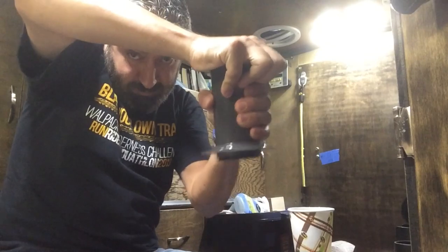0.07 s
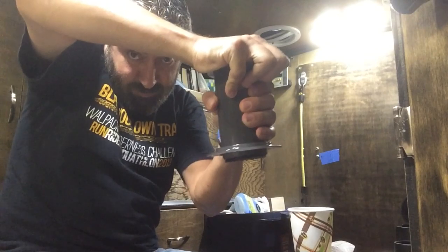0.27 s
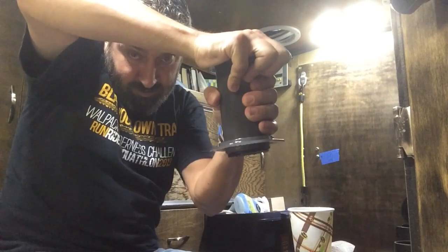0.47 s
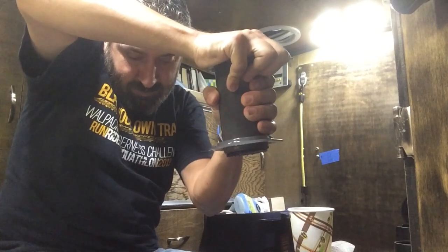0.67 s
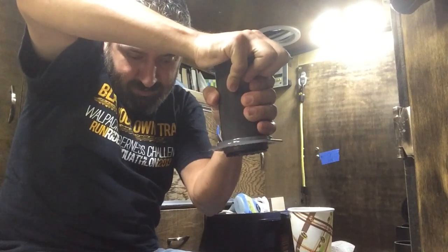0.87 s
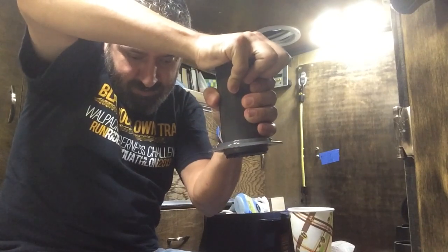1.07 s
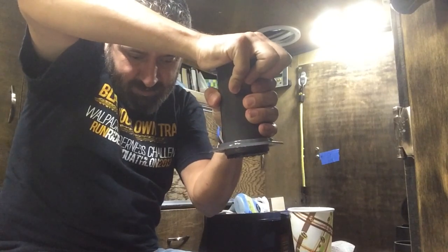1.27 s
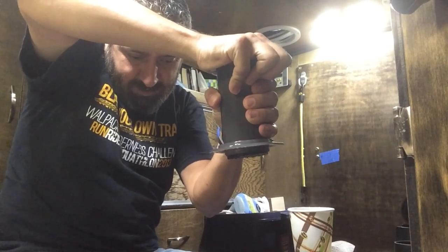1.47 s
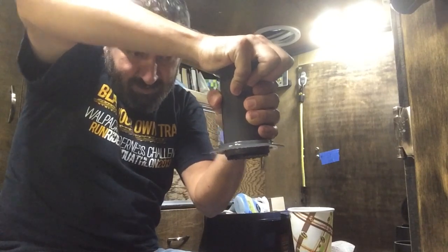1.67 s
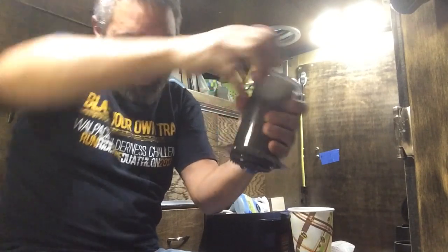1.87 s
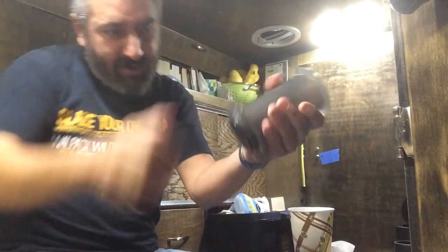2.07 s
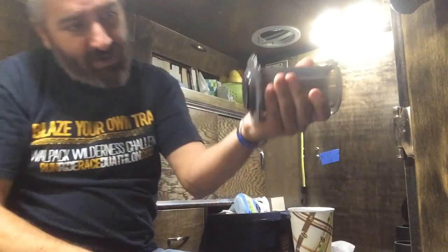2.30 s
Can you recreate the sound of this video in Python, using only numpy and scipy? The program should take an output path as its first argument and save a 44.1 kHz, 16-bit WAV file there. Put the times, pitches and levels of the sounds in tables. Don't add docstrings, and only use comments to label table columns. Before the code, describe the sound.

Close to a small microphone in a cramped van, a plunger cracks loudly, spent grounds drop and patter in a bin, and after a low rumbling pause the empty tube scuffs and pops hollowly, rising in pitch.

```python
import sys
import numpy as np
from scipy import signal
from scipy.fft import rfft, irfft, next_fast_len
from scipy.io import wavfile
from scipy.ndimage import map_coordinates

SR = 44100
rng = np.random.default_rng(int(sys.argv[2]) if len(sys.argv) > 2 else 0)


def store_pcm(level_fs):
    pcm = np.round(np.clip(level_fs, -1, 1) * 32767).astype(np.int16)
    wavfile.write(sys.argv[1], SR, np.atleast_2d(pcm).T)


def voltage_ratio(decibels):
    exponent = np.asarray(decibels, float) / 20
    return 10 ** exponent


N = 103061
T = np.arange(N) / SR


def unit(x):
    return x / np.sqrt(np.mean(x ** 2) + 1e-20)


def along(points, hz):
    f, v = np.transpose(points)
    return np.interp(np.log(hz + 1), np.log(f + 1), v)


def filtered(x, response):
    size = next_fast_len(len(x) + 8192)
    gain = response(np.fft.rfftfreq(size, 1 / SR))
    return irfft(rfft(x, size) * gain, size)[:len(x)]


def fall(start_s, t60_s, rise_s=0.00012):
    t = np.maximum(T - start_s, 0)
    return voltage_ratio(-60 * t / t60_s) * (1 - np.exp(-t / rise_s))


def ring(start_s, hz, db, t60_s):
    phase = 2 * np.pi * rng.random()
    return voltage_ratio(db) * fall(start_s, t60_s) * np.sin(2 * np.pi * hz * (T - start_s) + phase)


# pitch in Hz, level in dB, t60 in seconds.
SLIDE_MODES = [(2532, -19.5, 0.033), (917.4, -23.5, .04), (356, -26, 0.037), (8100, -46, 0.092),
               (55.3, -29, 0.21), (150, -31, 0.024)]


def slide():
    hiss = unit(filtered(rng.standard_normal(N), lambda f: 1 / (1 + (f / 3000) ** 2)))
    modes = sum(ring(-0.00084, *mode) for mode in SLIDE_MODES)
    return modes + voltage_ratio(-36) * fall(-.001, .05) * hiss


SNAP_S = .0098
# frequency in Hz, level in dB.
CLATTER_SPECTRUM = [(60, -11), (550, -5.5), (900, -16.5), (1550, 4), (2000, -11), (4200, -1), (8000, -10),
                    (15000, -32.5)]
# frequency in Hz, t60 in seconds.
CLATTER_DECAY = [(100, 0.12), (500, 0.056), (2000, .13), (6000, .11), (14000, 0.04)]


def clatter():
    hz, t, noise = signal.stft(rng.standard_normal(SR // 2), SR, nperseg=128)
    early = voltage_ratio(along(CLATTER_SPECTRUM, hz))[:, None] * noise
    early_rms = np.sqrt(np.mean(signal.istft(early, SR, nperseg=128)[1] ** 2))
    decay = voltage_ratio(-60 * t / along(CLATTER_DECAY, hz)[:, None])
    tail = signal.istft(early * decay, SR, nperseg=128)[1] / early_rms
    out = np.zeros(N)
    out[round(SNAP_S * SR):][:len(tail)] = voltage_ratio(-7) * tail
    return out


# pitch in Hz, level in dB.
SHELL_MODES = [(1172, -6), (1546, 0), (1755, -4), (2300, -3), (2488, 0), (2670, 0), (2950, -8), (3510, -6),
               (4020, 2), (4240, 2), (4478, 1), (4923, -5), (5387, -5), (6260, -8)]
# pitch in Hz, level in dB, t60 in seconds.
HOLLOW_MODES = [(540, -6, .03), (390, -15, .05)]


def snap():
    noise = unit(filtered(rng.standard_normal(N), lambda f: 1 / (1 + (f / 8000) ** 2)))
    crack = voltage_ratio(-11.5) * fall(SNAP_S, .006) * noise
    hollow = sum(ring(SNAP_S, *mode) for mode in HOLLOW_MODES)
    shell = sum(ring(SNAP_S, hz, db - 18, t60_s=.1) for hz, db in SHELL_MODES)
    rim = ring(.03, hz=1505, db=-22, t60_s=.17)
    return clatter() + crack + hollow + shell + rim


# frequency in Hz, level in dB.
CABIN_SPECTRUM = [(20, -9.5), (75, -2), (190, -10), (300, -18), (1120, -24), (2200, -32.5), (2700, -39.5),
                  (14900, -49)]
# centre in Hz, width in Hz, level in dB at 1 s.
HUMS = [(570, 12, -69), (732, 20, -77), (1141, 30, -76), (90, 25, -60)]


def cabin():
    noise = rng.standard_normal(N)
    air = voltage_ratio(-51.5) * unit(filtered(noise, lambda f: voltage_ratio(along(CABIN_SPECTRUM, f))))
    rumble = filtered(air, lambda f: 1 / (1 + (f / 250) ** 4))
    lumps_db = 2 * map_coordinates(rng.standard_normal(40), [T * 12])
    air += rumble * (voltage_ratio(lumps_db) - 1)
    growth_db = 2 * (T - 1)
    for hz, width_hz, db in HUMS:
        hum = unit(filtered(rng.standard_normal(N), lambda f: 1 / (1 + (2 * (f - hz) / width_hz) ** 2)))
        air += voltage_ratio(db + growth_db) * hum
    hold_s, recover_s, duck_db = .22, .2, -7.5
    return air * voltage_ratio(duck_db * np.clip(1 - (T - hold_s) / recover_s, 0, 1))


def van(x):
    burst = rng.standard_normal(N) * fall(0.006, t60_s=0.13, rise_s=0.0025)
    tail = filtered(burst, lambda f: 1 / (1 + f / 5000))[:SR // 2]
    return signal.fftconvolve(x, tail / np.linalg.norm(tail))[:N]


# start in seconds, level in dB, pitch in
# Hz, t60 in seconds.
THUDS = [(.262, -36, 540, .04), (.2655, -37, 960, .03), (.298, -32, 2950, .025), (.308, -34, 760, .045),
         (.318, -36, 890, .05), (.328, -36, 580, .04), (.262, -42, 5000, .022), (.414, -41, 85, .08),
         (.262, -43, 150, .06), (.299, -40, 5100, .015), (1.916, -50, 2500, .02), (1.916, -48, 910, .03),
         (.0375, -24, 2350, .06), (.345, -44, 4400, .03)]
# start in seconds, pitch in Hz, level in dB, t60 in seconds.
WALL_PANEL = (1.945, 570, -53, .9)


def thuds():
    return ring(*WALL_PANEL) + sum(ring(s, hz, db, t60_s) for s, db, hz, t60_s in THUDS)


# start in seconds, level in dB, t60 in seconds, centre in Hz,
# width in octaves.
NOISE_BURSTS = [(.213, -57, 0.016, 10100, 0.93), (.232, -71, 0.049, 6000, 3.7),
                (.246, -50, 0.014, 12000, .4), (0.297, -43, 0.013, 9000, 0.33),
                (.332, -27.5, 0.024, 10000, 2.3), (.357, -40, 0.097, 1510, 0.11),
                (.38, -56, 0.013, 12000, .7), (.394, -38.5, 0.017, 7000, 0.8), (.428, -50, 0.013, 8900, .7),
                (.454, -59, 0.12, 6360, 0.32), (.459, -60, 0.42, 3280, .2), (.468, -41.5, 0.078, 1760, 0.74),
                (.471, -52, 0.051, 9900, 1.6), (.592, -57, 0.022, 10040, 0.95),
                (1.057, -66.5, 0.12, 7940, 0.7), (1.096, -68, 0.077, 3270, 0.27),
                (1.098, -66, 0.11, 11000, 1.7),
                (.012, -55, 0.68, 584, 0.93), (.306, -32, 0.042, 714, 0.56), (.263, -39, 0.093, 760, 0.7),
                (1.742, -62.5, 0.21, 2000, 0.91), (1.917, -49, 0.09, 1300, 1.8), (.06, -68, 0.64, 4000, 1),
                (1.771, -56, 0.088, 2153, 1.1), (1.871, -54.5, 0.098, 3950, 0.83),
                (1.871, -42, 0.036, 1160, 0.83), (1.893, -56, 0.35, 3200, 1.04),
                (1.918, -55, 0.066, 3950, 0.78), (1.93, -51, 0.052, 3000, 1.54),
                (1.929, -41, 0.054, 1700, 0.8), (1.946, -46.5, 0.0374, 2130, 0.36),
                (1.97, -81, 4.5, 6950, 0.27), (2.288, -55, 0.057, 3450, 0.89),
                (2.303, -64.5, 0.3, 5700, 1.1), (.0098, -24, .02, 12000, 0.67),
                (1.855, -66.5, .4, 6960, 1.1)]


def rustles():
    out = np.zeros(N)
    for s, db, t60_s, hz, octaves in NOISE_BURSTS:
        noise = filtered(rng.standard_normal(SR),
                         lambda f: voltage_ratio(-6 * (np.log2((f + 1) / hz) / octaves) ** 2))
        start = round(s * SR)
        envelope = fall(s, t60_s, .001)[start:start + SR]
        out[start:start + SR] += voltage_ratio(db) * envelope * unit(noise)[:N - start]
    return out


# time in seconds, level in dB.
CRUMB_FLOW = [(0.232, -58.5), (0.259, -62), (0.265, -45.5), (0.292, -55), (0.299, -38.5), (0.352, -36.5),
              (.39, -52), (.45, -59), (.56, -74)]
# frequency in Hz, level in dB.
CRUMB_SPECTRUM = [(120, -52), (200, -12), (311, -12), (883, -11), (1180, -16.5), (1620, -12.5),
                  (13800, -18.5), (15100, -27), (16000, -37)]


def grounds():
    rate_per_s, spread_db, hiss_db, clump_db = 2500, 1, 4, 1.3
    hits = rng.random(N) < rate_per_s / SR
    clicks = hits * voltage_ratio(spread_db * rng.exponential(size=N)) * rng.standard_normal(N)
    mix = unit(clicks) + voltage_ratio(hiss_db) * rng.standard_normal(N)
    rain = unit(filtered(mix, lambda f: voltage_ratio(along(CRUMB_SPECTRUM, f))))
    clumps = map_coordinates(rng.standard_normal(600), [T * 220])
    s, db = np.transpose(CRUMB_FLOW)
    return rain * voltage_ratio(np.interp(T, s, db, -120, -120) + clump_db * clumps)


# time in seconds, pitch in Hz.
AIR_PITCH = [(1.77, 450), (1.79, 515.3), (1.81, 566), (1.83, 583.5), (1.875, 617), (1.915, 648.4),
             (2.0, 630)]
# start in seconds, level in dB, rise in seconds, t60 in seconds.
AIR_POPS = [
    (1.774, -40, 0.0011, .07),
    (1.789, -40, 0.0011, 0.16),
    (1.872, -40.5, .003, 0.12),
    (1.893, -55, .003, .06),
    (1.917, -25.5, .003, 0.11),
    (1.926, -25.5, 0.0025, 0.12),
]


def tube():
    phase = 2 * np.pi * np.cumsum(np.interp(T, *np.transpose(AIR_PITCH))) / SR
    pushes = sum(voltage_ratio(db) * fall(s, t60_s, rise_s) for s, db, rise_s, t60_s in AIR_POPS)
    return pushes * np.sin(phase)


def scene():
    squeeze_s, squeeze_over_s, squeeze_db = 0.034, .025, -9.5
    squeeze = voltage_ratio(squeeze_db * np.clip((T - squeeze_s) / squeeze_over_s, 0, 1))
    stop = (slide() + snap()) * squeeze
    near = stop + thuds() + rustles() + grounds() + tube()
    return (near + voltage_ratio(-32) * van(near) + cabin())[None]


def top_cut(x):
    return signal.sosfilt(signal.butter(12, 16390, fs=SR, output="sos"), x)


def record(dry):
    mic = filtered(dry[0], lambda f: 1 / (1 + (f / 15300) ** 60))[None]
    return top_cut(np.clip(mic, -1, 1))


dry = scene()
out = record(dry)
store_pcm(out)
```